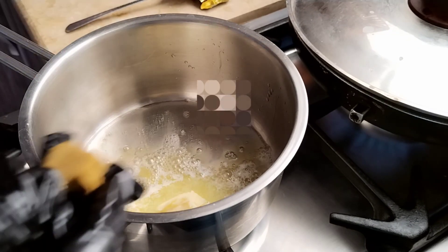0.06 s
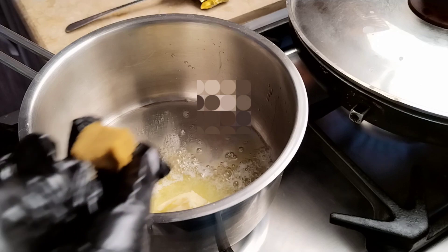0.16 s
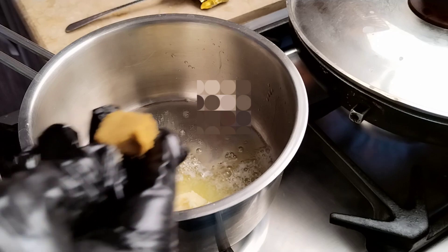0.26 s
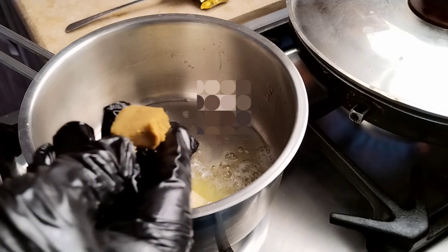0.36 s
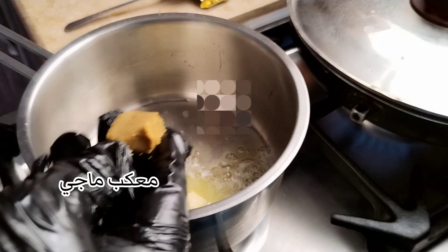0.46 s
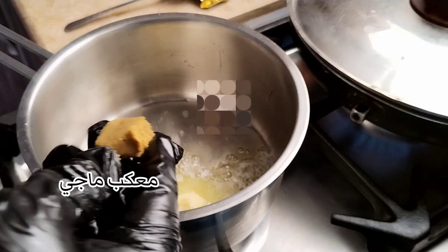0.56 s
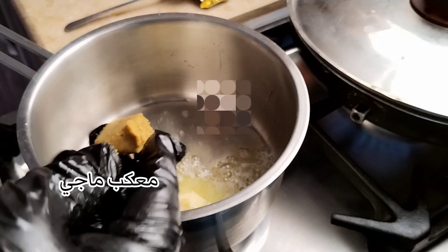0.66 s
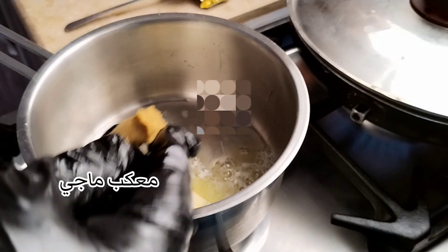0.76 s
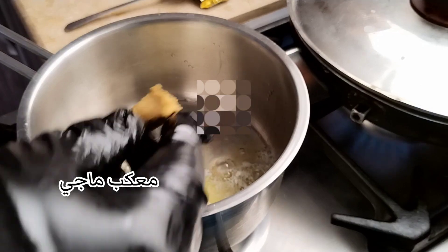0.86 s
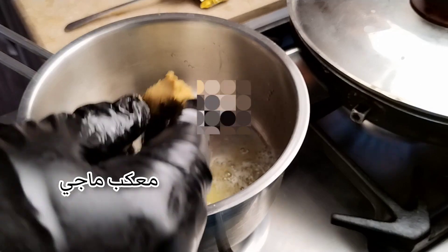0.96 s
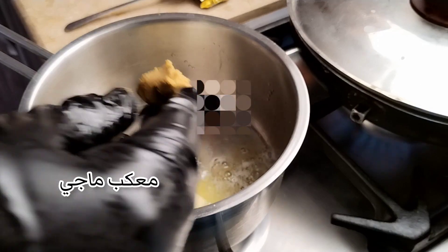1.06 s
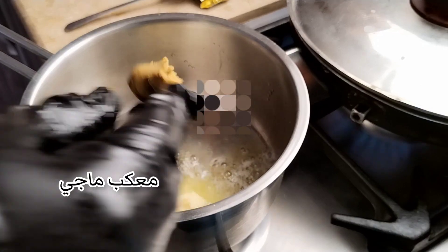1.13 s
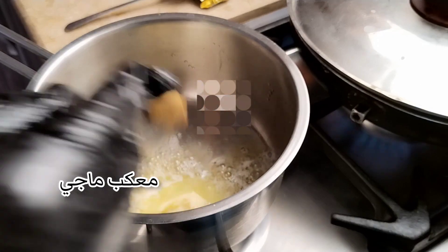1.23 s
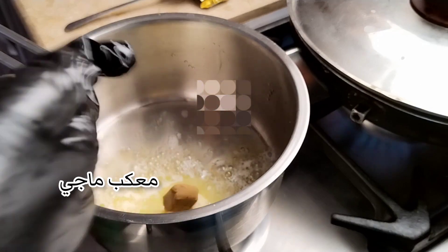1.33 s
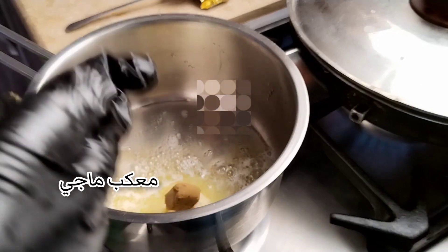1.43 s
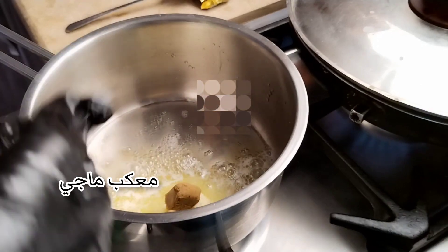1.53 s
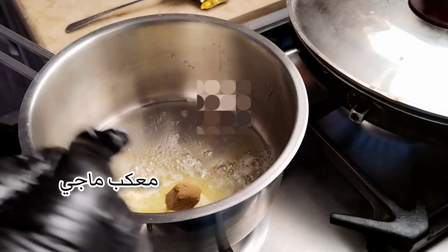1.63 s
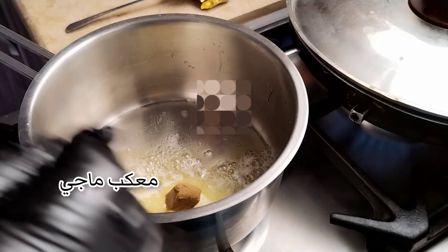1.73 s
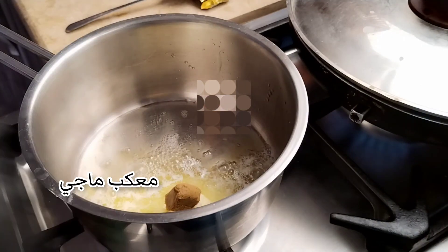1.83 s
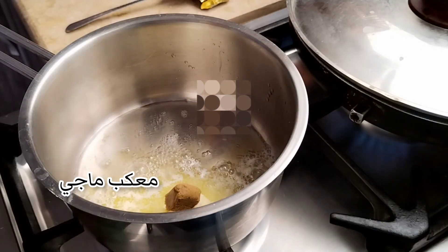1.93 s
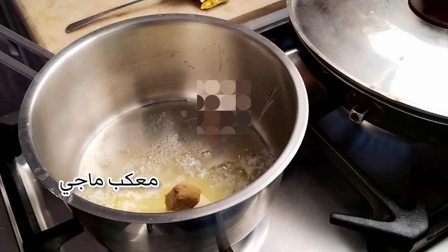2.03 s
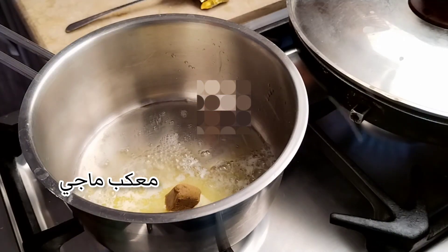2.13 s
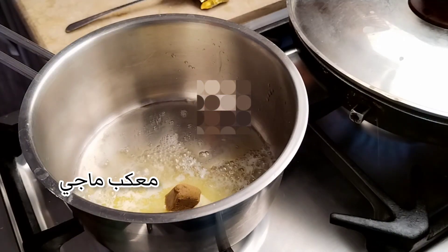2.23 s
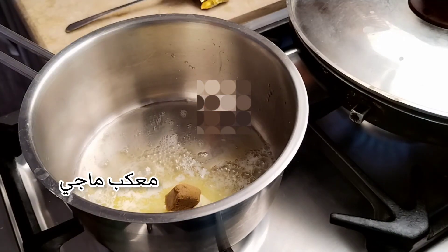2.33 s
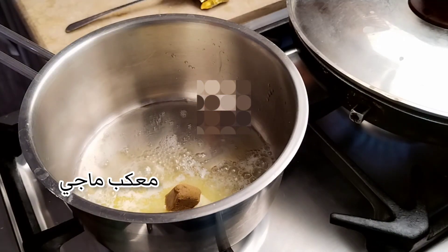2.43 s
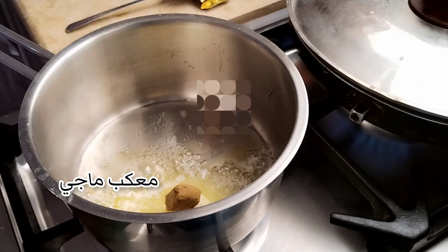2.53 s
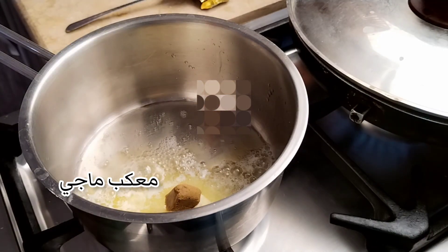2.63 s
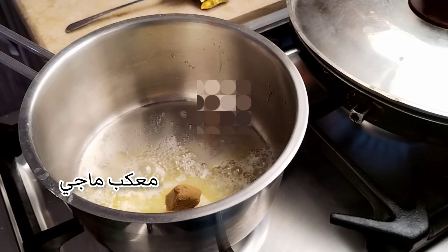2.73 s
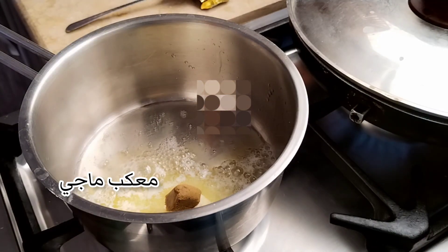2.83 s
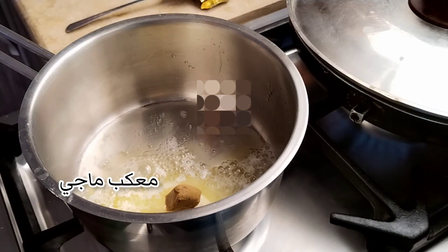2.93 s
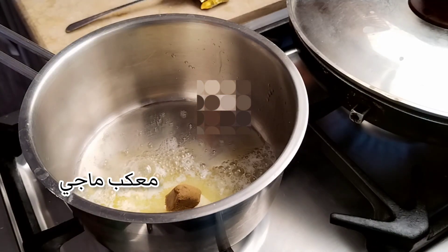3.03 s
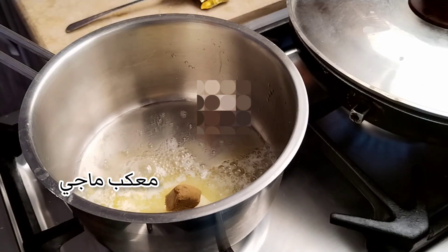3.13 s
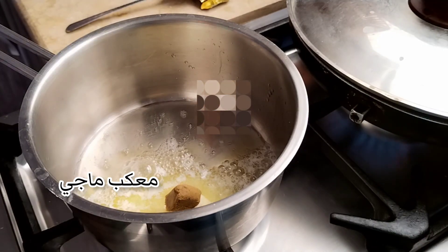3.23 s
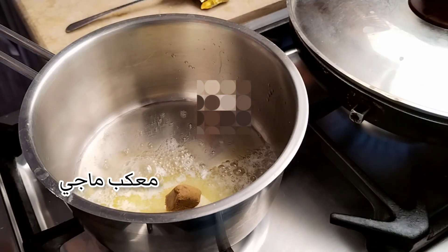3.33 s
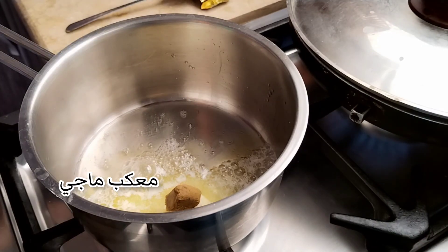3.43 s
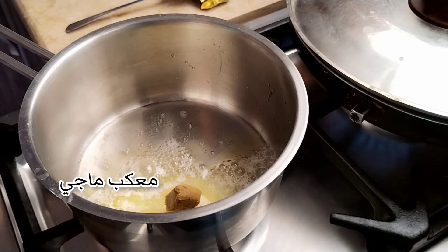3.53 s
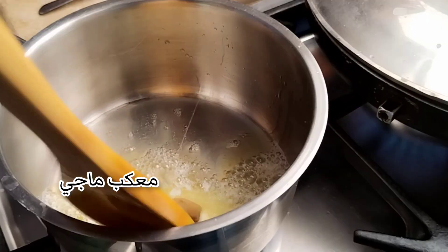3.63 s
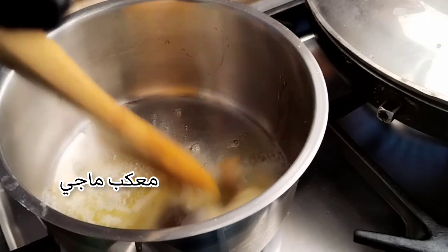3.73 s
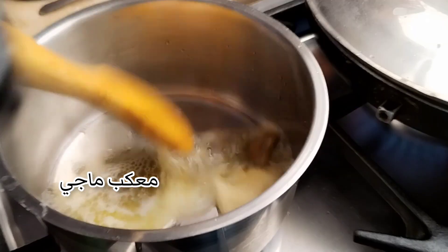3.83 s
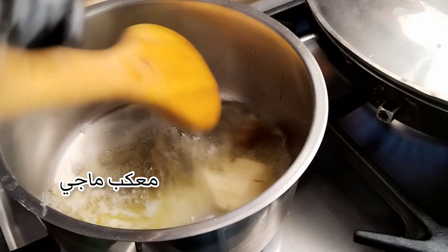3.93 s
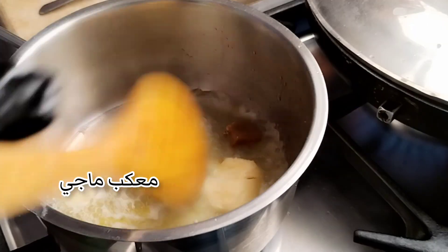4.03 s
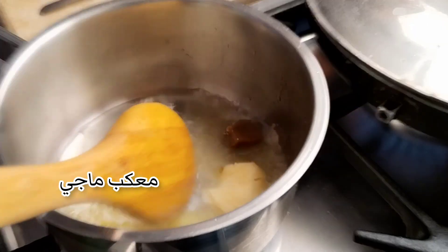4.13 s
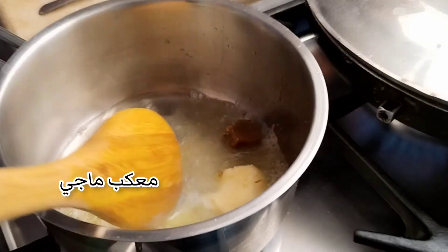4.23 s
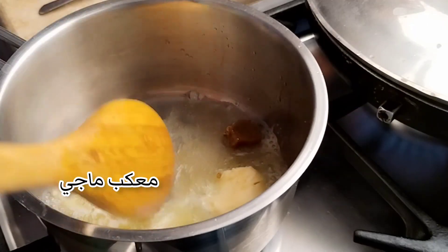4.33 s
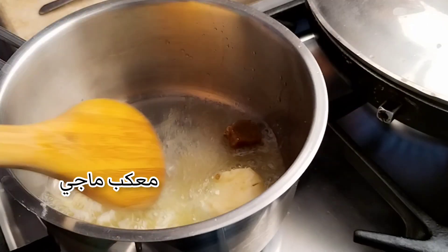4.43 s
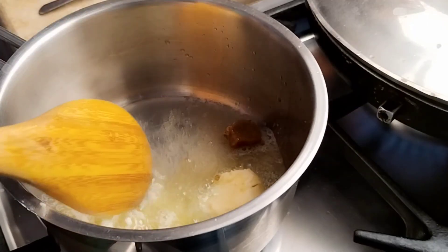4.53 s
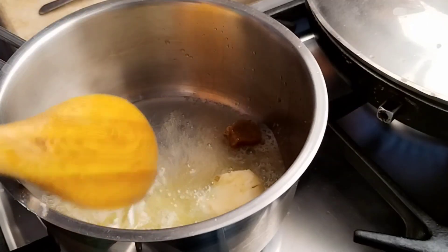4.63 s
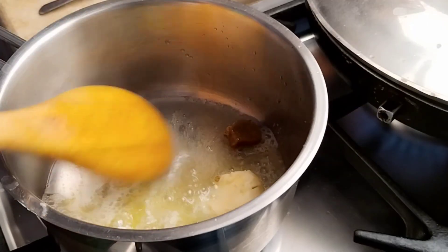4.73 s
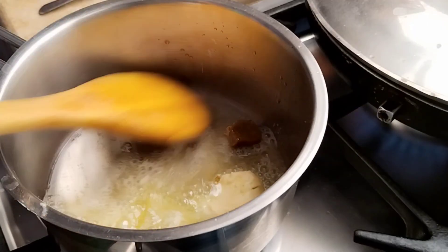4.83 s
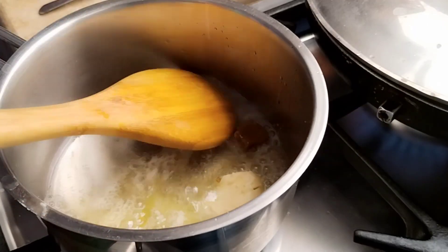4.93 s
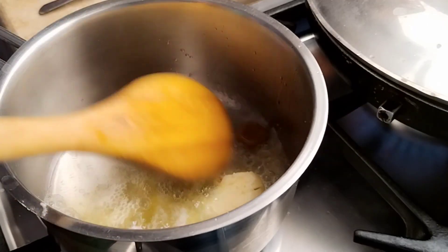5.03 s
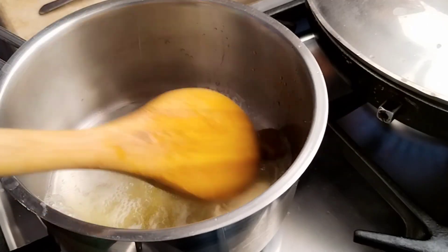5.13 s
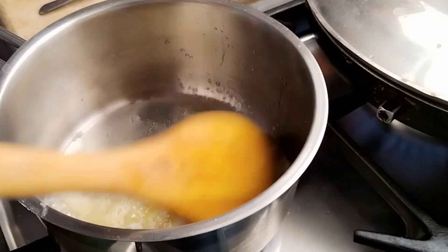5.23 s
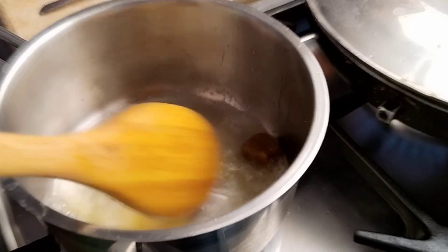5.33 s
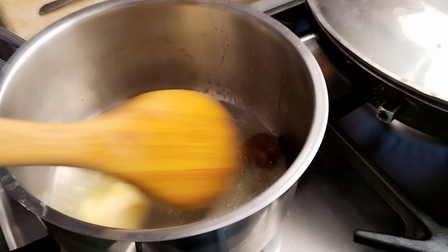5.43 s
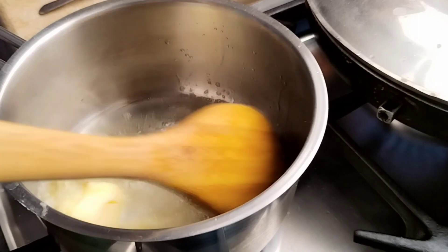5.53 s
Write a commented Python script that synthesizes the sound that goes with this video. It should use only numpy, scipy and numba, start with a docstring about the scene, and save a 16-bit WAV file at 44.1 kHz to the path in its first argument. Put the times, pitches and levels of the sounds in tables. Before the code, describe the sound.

Butter fries quietly in a steel pot on a gas ring, heard close in a small kitchen. Thin uneven sizzle and dry spits run from the start over faint low flame rumble. A bird buzzes faintly at the opening, and another whistles upward at about 0.9 s. At 1.4 s a soft cube lands with a dull thud and brief tumble; the sizzle rises a little, a bird buzzes at 1.6 s, and a cluster of hollow bubbles blurts around 2.0-2.2 s. Sizzling swells, then thins after 2.9 s amid faint chirps. At 3.57 s the sound cuts abruptly to hotter fat: a wooden spoon knocks the pot, hardest near 3.7 s, with short metallic ringing. More blows and scrapes follow around 4.1, 4.5, 4.75, 4.9 and 5.3 s over fuller hissing and bubbling. Spits get sharper and denser, with strong pops near 5.3 and 5.5 s. Birds whistle at 4.5 s and buzz at 5.1 s.

```python
"""Butter frying on a gas ring.

Butter sizzles and spits in a steel pot: shaped noise, crowds of short bubbles, bursts of damped sines.
A stock cube drops in; at 3.57 s the scene cuts to hotter fat, where a wooden spoon knocks the pot.
Blows are damped sines on wood and pot modes. Bass noise is the flame.
Small birds outside whistle and buzz: gliding and warbled near-sines with echoes.
"""
import sys
import numpy as np
from scipy import signal
from scipy.fft import rfft, irfft, next_fast_len
from scipy.io import wavfile
from scipy.ndimage import uniform_filter1d
from numba import njit

SR = 44100
rng = np.random.default_rng(int(sys.argv[2]) if len(sys.argv) > 2 else 0)


def pcm_store(signal):
    """Save signal as 16-bit PCM."""
    levels = np.round(np.clip(np.atleast_2d(signal), -1, 1) * 32767)
    wavfile.write(sys.argv[1], SR, levels.astype(np.int16).T)


N = 245179


def undb(db):
    """dB to gain."""
    return 10 ** (np.asarray(db, float) / 20)


def unit(x):
    """Scale to rms 1."""
    return x / np.sqrt(np.mean(x ** 2))


def split_off(x, order, hz, side):
    """Zero-phase low-pass or high-pass."""
    return signal.sosfiltfilt(signal.butter(order, hz, side, fs=SR, output="sos"), x)


def at_pitch(hz, table):
    """Read a (Hz, value) table on a log pitch axis."""
    at_hz, value = np.transpose(table)
    return np.interp(np.log(hz), np.log(at_hz), value)


def colour(x, points):
    """Shape a spectrum by (Hz, dB) points."""
    n = next_fast_len(x.shape[-1])
    f = np.maximum(np.fft.rfftfreq(n, 1 / SR), 1)
    return irfft(rfft(x, n) * undb(at_pitch(f, points)), n)[..., :x.shape[-1]]


def curves(table):
    """Columns of a table, one value per sample."""
    s, *columns = np.transpose(table)
    return [np.interp(np.arange(N) / SR, s, c) for c in columns]


def walk(rate):
    """Random levels held 1 / rate s and slewed; rms 1."""
    k = int(SR / rate)
    held = np.repeat(rng.standard_normal(N // k + 1), k)
    return unit(uniform_filter1d(held, k)[:N])


def pair(like):
    """Two noises that share the part `like` of their power."""
    mid, side = rng.standard_normal((2, N))
    like = np.clip(like, 0, 1)
    opposed = side * np.array([[1], [-1]])
    return (np.sqrt(1 + like) * mid + np.sqrt(1 - like) * opposed) / np.sqrt(2)


def pan(db):
    """Left and right gains for a left-minus-right level."""
    return undb(np.array([db, -db]) / 2)


@njit
def rings(n, sr, at, hz, t60, rise, glide, left, right, turn):
    """Damped sines that start at given samples; the right port hears each at another phase."""
    out = np.zeros((2, n))
    for e in range(len(at)):
        step = np.exp(2j * np.pi * hz[e] / sr - np.log(1000.) / (t60[e] * sr))
        bend = np.exp(2j * np.pi * hz[e] * glide[e] / sr ** 2)
        lead, z = np.exp(1j * turn[e]), 1 + 0j
        shut, opening = 1., np.exp(-1 / (rise[e] * sr))
        for i in range(at[e], min(n, at[e] + int(t60[e] * sr))):
            out[0, i] += (1 - shut) * left[e] * z.imag
            out[1, i] += (1 - shut) * right[e] * (z * lead).imag
            z, step, shut = z * step, step * bend, shut * opening
    return out


def ring(s, hz, t60, rise, glide, db, pan_db, turn):
    """Damped sines from columns; rise = attack in s, glide = share of pitch gained per second."""
    columns = np.broadcast_arrays(s, hz, t60, rise, glide, db, pan_db, turn)
    s, hz, t60, rise, glide, db, pan_db, turn = (np.ravel(c) * 1. for c in columns)
    left, right = undb(db) * pan(pan_db)
    hz, t60, rise = np.minimum(hz, .4 * SR), np.maximum(t60, 1e-4), np.maximum(rise, 1e-5)
    return rings(N, 1. * SR, (s * SR).astype(np.int64), hz, t60, rise, glide, left, right, turn)


def echo(x, t60, wet_db):
    """Diffuse decaying-noise tail, nearly alike left and right."""
    t = np.arange(int(t60 * SR)) / SR
    envelope = undb(-60 * t / t60) * np.minimum(t / 0.0011, 1)
    mid, side = rng.standard_normal((2, SR))[:, :len(t)] * envelope
    tail = mid + colour(side, [(250, -27.0), (700, -27.5)]) * np.array([[1], [-1]])
    tail = tail / np.sqrt(np.sum(tail[0] ** 2))
    return undb(wet_db) * signal.fftconvolve(x, tail, axes=1)[:, :N]


def bubbles(count, lo_hz, hi_hz, cycles, glide, scatter_db):
    """Bubbles at random moments, pitches and places, a few louder than the rest."""
    u = rng.random((count, 4)).T
    hz = lo_hz * (hi_hz / lo_hz) ** u[1]
    db = np.minimum(-scatter_db * np.log(1 - u[2]), 4 * scatter_db)
    pan_db, turn = 12 * (u[3] - .5), 6 * u[3] - 3
    return unit(ring(u[0] * N / SR, hz, cycles / hz, cycles / hz / 8, glide, db, pan_db, turn))


def chirp(hz):
    """A near-sine voice with faint second harmonic, and third below 5 kHz."""
    phase = 2 * np.pi * np.cumsum(hz) / SR
    third = (hz < 5000) * np.sin(3 * phase)
    return np.sin(phase) + undb(-40) * np.sin(2 * phase) + undb(-42) * third


# Rising whistles. Each row: start in s, length in s, start pitch in Hz, level in dB.
RISES = [(0.901, 0.12, 3020, -53), (2.379, 0.1, 3026, -54.5), (3.083, .124, 3030, -51.5),
         (4.483, 0.097, 3094, -49.5)]
# Notes that fall fast and level off. Each row: start in s, length in s, start pitch in Hz, level in dB.
SLIDES = [(3.632, 0.0122, 4880, -50.5), (3.666, 0.013, 4960, -48), (3.692, 0.038, 4860, -51),
          (3.9, 0.04, 3970, -53), (4.07, 0.0425, 3820, -54), (4.3, 0.016, 4674, -53)]
# Faint high notes, drooping. Each row: start in s, length in s, start pitch in Hz, level in dB.
DROOPS = [(2.874, 0.084, 8570, -77.5), (3.047, 0.073, 6100, -67.5), (3.176, 0.06, 6050, -68),
          (3.299, 0.033, 5820, -68), (3.396, 0.04, 5970, -68), (3.498, 0.047, 5970, -74)]
# Run of hooked chips. Each row: start in s, level in dB.
CHIPS = [(2.963, -65), (3.081, -62.5), (3.181, -61.5), (3.262, -57.5), (3.349, -57.5), (3.444, -57.5),
         (3.516, -55.5)]
# Glides. Each: pitch half way, at 85 % and at the end, as multiples of the start pitch.
RISE_SHAPE = (1.095, 1.245, 1.36)
SLIDE_SHAPE = (.89, .85, .84)
DROOP_SHAPE = (.965, .915, .885)
CHIP_SHAPE = (1.1, .8, .66)
TYPICAL_CHIP_S, TYPICAL_CHIP_HZ = .018, 2250
# rising notes: power of growth, share of length to stop over, extra share of pitch at the very end
RISE_SWELL, RISE_STOP, RISE_FLICK = .95, .05, .13


def whistles():
    """Pure notes gliding on a cubic of log pitch."""
    x, t = np.zeros(N), np.arange(N) / SR
    notes = [(*row, RISE_SHAPE) for row in RISES]
    notes += [(*row, SLIDE_SHAPE) for row in SLIDES]
    notes += [(*row, DROOP_SHAPE) for row in DROOPS]
    for (s, db), (a, b) in zip(CHIPS, rng.standard_normal((len(CHIPS), 2))):
        notes.append((s, TYPICAL_CHIP_S * 1.2 ** a, TYPICAL_CHIP_HZ * 1.04 ** b, db, CHIP_SHAPE))
    for s, length, start_hz, db, shape in notes:
        pitch = start_hz * np.array([1, *shape])
        i = slice(int(s * SR), int((s + length) * SR))
        u = np.clip((t[i] - s) / length, 0, 1)
        hz = np.exp(np.polyval(np.polyfit([0, .5, .85, 1], np.log(pitch), 3), u))
        gain = abs(np.sin(np.pi * u)) ** .6
        if pitch[-1] > pitch[0]:
            hz = hz * (1 + RISE_FLICK * u ** 20)
            gain = u ** RISE_SWELL * np.minimum((1 - u) / RISE_STOP, 1)
        x[i] += undb(db) * gain * chirp(hz)
    return x


# Buzzes. Each row: start in s, length in s, mean pitch in Hz, level in dB.
BUZZES = [(-.1, 0.25, 4364, -52.5), (1.624, 0.2, 4452, -54), (3.78, 0.11, 4320, -52.5),
          (5.07, 0.22, 4390, -54)]
MEAN_WARBLE_HZ, WARBLE_DEPTH_HZ = 180.7, 397


def buzzes():
    """Notes with a fast, unsteady warble of pitch, slightly louder at the top of each warble."""
    x, t = np.zeros(N), np.arange(N) / SR
    waver, drift = walk(60), walk(90)
    beat = np.sin(2 * np.pi * np.cumsum(MEAN_WARBLE_HZ * (1 + 0.16 * waver)) / SR)
    for s, length, hz, db in BUZZES:
        u = np.clip((t - s) / length, 0, 1)
        gain = abs(np.sin(np.pi * u)) ** 0.71 * (1 + 0.017 * beat)
        x += undb(db) * gain * chirp(hz + WARBLE_DEPTH_HZ * beat + 45 * drift)
    return x


DIRECT_DB, NEAR_T60_S, NEAR_DB, YARD_T60_S, YARD_DB = -2, .07, -1.5, 0.78, -3


def birds():
    """Whistles and buzzes of unsteady level, smeared by the yard and the kitchen."""
    x = (whistles() + buzzes()) * undb(2.3 * walk(70)) * pan(0.33)[:, None]
    return undb(DIRECT_DB) * x + echo(x, NEAR_T60_S, NEAR_DB) + echo(x, YARD_T60_S, YARD_DB)


# Under the hiss. Each row: time in s, low simmer in dB, high simmer in dB, flame in dB.
STOVE = [(0, -76.5, -91, -70), (.35, -83, -86, -73.5), (.9, -79.5, -84, -73), (1.3, -81, -85.5, -80.5),
         (1.5, -83.5, -91, -65), (1.94, -78, -85.5, -73.5), (2.16, -78, -80, -71.5),
         (2.44, -83, -77, -68.5), (2.7, -73.5, -79, -70.5), (2.95, -86.5, -82, -79),
         (3.3, -80.5, -81, -64.5), (3.57, -82, -84, -73.5), (3.574, -57, -56.5, -61.5),
         (3.7, -69, -63.5, -74), (4.05, -72, -59, -66.5), (4.3, -55, -55, -63.5), (4.5, -72, -64, -72),
         (4.85, -73.5, -58, -67), (5.05, -75, -54, -62.5), (5.15, -112, -62.5, -67.5),
         (5.28, -60, -66, -63.5), (5.56, -73, -54, -60)]
# Flame spectrum. Each row: pitch in Hz, relative level in dB.
FLAME = [(12, -18), (20, -72), (38, -6), (81, -9), (97, -0.5), (118, 6), (149, -6.5), (163, -3),
         (236, -14.5), (300, -52), (390, -20.5), (660, -120)]
FLAME_LIKE, FLAME_LEFT_DB = .94, -4.5  # shared part of power, left minus right


def flame():
    """Gas flame: bass noise of wandering level, nearly alike left and right."""
    _, _, flame_db = curves(STOVE)
    rumble = unit(colour(pair(FLAME_LIKE), FLAME))
    return undb(flame_db + 2.2 * walk(9.6)) * rumble * pan(FLAME_LEFT_DB)[:, None]


# Cube lands and tumbles, then from 3.573 s the spoon strikes. Each row: start in s, thud in dB, clack in dB,
# tilt above the clack in dB per octave, scrape in dB, metal ring re the blow in dB, extra on the ping in dB.
KNOCKS = [(1.4, -42, -76, 11, -64, -27, -2), (1.407, -47.5, -103, 17, -55, -12.5, -5),
          (1.427, -47.5, -101, -6, -87, -20, -2), (1.448, -53, -94, 9, -74, -26, -4),
          (1.466, -52.5, -92, -2, -80, -24, 0), (1.501, -50.5, -88, -3, -83, -29, 0),
          (1.532, -57, -75, 5, -77, -35, -7), (3.573, -42, -37.5, -15.5, -60, -9, -10),
          (3.59, -39, -38, -21, -67, -22, -3), (3.605, -45, -55, -17, -60, -20, 2),
          (3.668, -53, -35, -19, -50.5, -28, -4), (3.722, -28.5, -22.5, -12.5, -55, -14, -2),
          (3.76, -29, -37.5, -7, -32.5, -18, -14), (3.778, -35, -38, -0.5, -49, -12, -3.5),
          (4.095, -47.5, -23, -10.5, -48, -13, -2), (4.102, -35, -32.5, -10.5, -35, -10, 6),
          (4.498, -109, -40, -6.5, -53, -22, 2), (4.749, -110, -35.5, -13.5, -47, -16, 9),
          (4.888, -39, -28, -11.5, -38, -16, -6), (4.899, -31.5, -29.5, -23, -44.5, -18, 3),
          (5.203, -67, -56, 5, -67, -22, 1), (5.321, -30, -28, -2.5, -85, -13.5, -12),
          (5.471, -75, -33, -8, -40, -22.5, 3)]
# Pot modes. Each row: pitch in Hz, relative level in dB, t60 in s before RING_SHARE and scatter.
POT = [(205.2, 10, 1.09), (266.4, -1.5, 0.75), (287.8, -3, 1.2), (315, -12.5, 0.75), (410, -4, 0.55),
       (557.6, -2.5, 0.51), (752, -13, 0.75), (820, -11, 0.79), (860, -7, 1.7), (1095, 2, 0.78),
       (1286, -14.5, 1.6), (1527, -4, 1.3), (2290, -12, 0.14), (2810, 8, 0.27), (3320, -1.5, 0.39),
       (5540, 8, 0.09), (6530, 10.5, 0.057), (6740, 2.5, 0.12)]
# Colour of a blow by pot and spoon. Each row: pitch in Hz, gain in dB.
BODY = [(175, -14), (240, -7), (330, -12.5), (420, -1.5), (500, -14), (600, -0.5), (700, 0), (810, -1.5),
        (1050, -16), (1300, 3), (1520, 11.5), (1900, 2), (2300, 9.5), (2900, 1), (4500, 9)]
# Balance of a blow. Each row: pitch in Hz, left minus right in dB.
BLOW_PAN = [(60, -1.5), (110, -3), (200, -7), (380, 1.5), (700, -3), (1290, -3), (2380, -8.5), (4400, -1),
            (8120, -12), (15000, 3.5)]
# Phase of a blow before scatter. Each row: pitch in Hz, lead of the left port in radians.
BLOW_PHASE = [(250, 0.03), (500, 0.95), (780, 1.5), (1500, -2.5), (2240, -6), (4480, -4)]
# Kitchen's answer to a blow. Each row: pitch in Hz, gain in dB.
TAIL_COLOUR = [(300, 7), (1000, -1.5), (2200, -4), (5000, -4)]
THUD_HZ, CLACK_HZ, TILT_TO_HZ, SCRAPE_HZ = 300, 800, 2450, 5800
WOOD_DB, RING_SHARE, CONTACT_S = -6.5, 0.36, .0028
DRAG_S = 0.015  # the top of a blow is a short chatter of the spoon dragging
PING_HZ = 1527  # the mode that depends most on where the blow lands
PAIR_SPLIT = .006  # each mode is a close pair that beats


def knocks():
    """Each blow is a dense wooden thud; the pot's modes ring on, weighted by where and how hard it lands."""
    s, thud_db, clack_db, tilt_db, scrape_db, metal_db, ping_db = np.transpose(KNOCKS)
    s = s[:, None]
    tilted_db = clack_db + tilt_db * np.log2(TILT_TO_HZ / CLACK_HZ)
    bands_hz = [THUD_HZ, CLACK_HZ, TILT_TO_HZ, SCRAPE_HZ]
    bands_db = np.transpose([thud_db, clack_db, tilted_db, scrape_db])

    def blow_db(hz):
        push_db = [at_pitch(f, list(zip(bands_hz, b))) for f, b in zip(hz, bands_db)]
        return np.array(push_db) + at_pitch(hz, BODY)

    def turn(hz):
        scatter = np.clip(hz / 1500 - .1, .1, 2.) * rng.standard_normal(hz.shape)
        return scatter - at_pitch(hz, BLOW_PHASE)

    hz, mode_db, t60 = np.repeat(np.transpose(POT), 2, axis=1)
    u = rng.standard_normal((3, len(s), len(hz)))
    hz = hz * (1 + PAIR_SPLIT / 2 * (-1) ** np.arange(len(hz)) + .002 * u[0])
    t60 = RING_SHARE * t60 * 1.2 ** u[2]
    # low modes take longer to swing up under a soft wooden push
    rise = 1.2 / hz + DRAG_S / 4 * (hz > 4000)
    scatter_db = np.where(abs(hz - PING_HZ) < 40, ping_db[:, None], 4 * u[1] - 3)
    db = blow_db(hz) + mode_db + metal_db[:, None] + scatter_db
    metal = ring(s, hz, t60, rise, 0, db, at_pitch(hz[0], BLOW_PAN), turn(hz))

    u = rng.random((2, len(s), 40))
    hz = 185 * 40 ** ((np.arange(40) + u[0]) / 40)
    when = s + (CONTACT_S + DRAG_S * (hz > 4000)) * u[1]
    t60, rise = 9 / hz + .012, .12 / hz
    wood = ring(when, hz, t60, rise, 0, blow_db(hz) + WOOD_DB, at_pitch(hz, BLOW_PAN), turn(hz))

    blows = metal + wood + echo(colour(wood, TAIL_COLOUR), 0.54, -5) + echo(metal, .3, -8)
    return signal.sosfilt(signal.butter(4, 170, "high", fs=SR, output="sos"), blows)


TAIL_RE_CLACK_DB, TAIL_RISE_S, TAIL_T60_S = -23.5, 0.096, 0.5


def blow_tails():
    """Gain of the noise tail after each blow: a slow rise, then a long fall."""
    s, _, clack_db, *_ = (c[:, None] for c in np.transpose(KNOCKS))
    late = np.maximum(np.arange(N) / SR - s, 0)
    fall = undb(clack_db + TAIL_RE_CLACK_DB - 60 * late / TAIL_T60_S)
    return np.sum(fall * (1 - np.exp(-late / TAIL_RISE_S)), axis=0)


STEADIER_FROM_DB, STEADIER_TO_DB, STEADIER_SHARE = -85.5, -28.5, 0.65


def unevenness(hiss_db):
    """Between these hiss levels, random level changes shrink to STEADIER_SHARE as the hiss grows."""
    return np.interp(hiss_db, [STEADIER_FROM_DB, STEADIER_TO_DB], [1, STEADIER_SHARE])


# Simmer colour. Each row: pitch in Hz, gain in dB.
SIMMER = [(150, -13.5), (250, 1.5), (295, -2.5), (425, -9.5), (512, -15.5), (557, -5), (685, -5), (801, -7),
          (1180, -6), (1570, -3), (2130, -4.5), (2360, -2), (3000, -6), (3900, -56), (6600, -120)]
SIMMER_SPLIT_HZ = 1350


def simmer():
    """Noise plus the echo of small bubbles, in two bands of uneven level, swelling after each blow."""
    low_db, high_db, _ = curves(STOVE)
    hiss_db, _ = curves(FRY)
    small = bubbles(count=1200, lo_hz=450, hi_hz=2800, cycles=22, glide=.6, scatter_db=2.2)
    burble = colour(undb(2) * pair(.25) + echo(small, .12, 0), SIMMER)
    low = split_off(burble, 4, SIMMER_SPLIT_HZ, "low")
    tails = blow_tails()
    bands = (undb(low_db) + tails) * unit(low) + (undb(high_db) + tails) * unit(burble - low)
    return undb(3.65 * unevenness(hiss_db) * walk(17)) * bands


# Low bubbles. Each row: start in s, level in dB, pitch in Hz, left minus right in dB.
BLOOPS = [(.391, -58, 1588, 1), (.688, -61, 600, -17), (.753, -54, 850, 7), (1.237, -65, 419, 7),
          (1.364, -64.5, 645, 14), (1.37, -59, 776, 7), (1.52, -69, 774, 13), (1.613, -68, 411, 21),
          (1.661, -59, 616, 1), (1.83, -54, 740, 4), (1.942, -56, 580, -11), (1.998, -54, 710, -6),
          (2.027, -36, 770, 1), (2.094, -36, 1330, 0), (2.103, -34, 747, 1), (2.11, -58, 392, 14),
          (2.129, -51, 612, -11), (2.169, -62, 590, 1), (2.189, -47, 1380, 2), (2.23, -49, 1600, 3),
          (2.326, -54, 1650, 0), (2.228, -51, 717, 1), (2.38, -76, 293, 9), (2.385, -69.5, 572, -42.5),
          (2.505, -53.5, 722, 4), (2.563, -55, 783, 8), (2.685, -70, 790, 40), (2.919, -74.5, 589, -40.5),
          (3.003, -53.5, 585, -8), (3.081, -65.5, 407, 13), (3.347, -71, 410, 16), (3.399, -65, 415, 4)]
# cycles of ring at a given level; halved for so many dB louder
BLOOP_CYCLES, BLOOP_AT_DB, BLOOP_HALVES_DB = 40.3, -60.5, 22


def bloops():
    """Large bubbles: low notes that glide up with a small click, caught by the pot's air."""
    s, db, hz, pan_db = np.transpose(BLOOPS)
    t60 = BLOOP_CYCLES / hz * 2 ** ((BLOOP_AT_DB - db) / BLOOP_HALVES_DB)
    click = ring(s, 2.2 * hz, .008, .0002, 0, db - 9.5, pan_db, 2.1)
    x = ring(s, hz, t60, 0.0014, 0.93, db, pan_db, 1.28) + click
    return x + echo(x, 0.4, -4.0)


# Water droplets bursting in the fat. Each row: start in s, snap in dB, pitch in Hz,
# then re the snap in dB: hollow part, sharp part, splash.
SPITS = [(0.18, -40, 5700, -9, -5, -11), (0.246, -42.5, 5870, -37, -41, -3),
         (0.4705, -35.5, 5700, -15, -17, -1.5), (0.657, -49.5, 5800, -32, -33, 0),
         (0.7102, -51, 5750, -21, -24, -2), (0.7536, -48.5, 2850, 8, -10, -7),
         (0.829, -43, 5450, -10, -32, -3), (0.848, -46, 5630, -15, -30, -5),
         (0.871, -45.5, 3840, -28, -24, -3), (0.904, -41.5, 5800, -40, -29, -1),
         (1.07, -32.5, 5820, -10.5, -18, -7.5), (1.106, -39.5, 3150, -17, -43, 1),
         (1.1224, -35, 5590, -35, -11, 5), (1.1451, -31, 5800, -15, -41, -25),
         (1.2794, -33.5, 4080, -18.5, -5.5, -13.5), (1.406, -40, 5400, -9.5, -33, -35),
         (1.449, -36, 4900, -16.5, -7, 0), (1.515, -29.5, 7870, -14, -24, -13),
         (1.665, -29, 3300, -30, -21, -6), (1.8329, -48, 2820, -3, -31, -14),
         (1.846, -37.5, 5900, -20, -10, -6), (2.0282, -34.5, 5300, -14, -5.5, 1.5),
         (2.182, -48, 6700, -34, 10, -21), (2.243, -42, 5400, -27, -19, -8),
         (2.2802, -31.5, 5800, -11, -3, -1.5), (2.2897, -28.5, 6860, -8, -21, -27),
         (2.34, -48.5, 6460, -16, 8, 8.5), (2.5687, -33, 5900, -7.5, -6, -9),
         (2.6859, -42.5, 2470, 12, 7, -2), (2.762, -35.5, 5530, -15, 1, 0.5),
         (2.9587, -35.5, 5130, -11.5, -81, -2.5), (3.0966, -58, 5870, -28, 0.5, 25),
         (3.1088, -35.5, 4100, -27, -25, -6), (3.139, -52, 3340, -32, 19.5, -19),
         (3.415, -51, 5400, -24, -40, 4), (3.433, -46, 5840, -16, -34, -4),
         (3.466, -43.5, 5500, -25, -30, -8), (3.5493, -29.5, 6480, -42, -9, -53),
         (3.5745, -33, 5470, -12.5, -8.5, -2), (3.67, -44.5, 4900, 0, 6, -9), (4.08, -39, 6500, 3, -18, -6),
         (4.3802, -28.5, 4500, -25, -3, -8), (4.404, -32.5, 3320, -2, -9, -20),
         (4.501, -33, 5200, -7, -4, -30), (4.609, -33, 6240, -13, 8, -29),
         (4.6415, -38.5, 5150, -8.5, 12.5, 3), (4.751, -33, 2230, 12, -18, -10.5),
         (4.732, -32, 8400, -45, -9, -18), (4.777, -28, 6730, -17, 0.5, 1.5),
         (4.8492, -27, 8300, -8, -22, -6), (4.887, -29, 5600, -2.5, 5, -3),
         (4.9987, -47.5, 9000, 12, 21.5, 2.5), (5.085, -40, 8500, -34, -1, -15),
         (5.149, -37, 8200, -24, -3, -15), (5.204, -33, 2200, 1.5, -20, -7),
         (5.232, -37, 8760, -6.5, 16.5, -12), (5.255, -28, 7400, -22.5, -25, -13),
         (5.2957, -19, 6260, -8, -8.5, -6.5), (5.3655, -28.5, 8620, -21, -3, -20),
         (5.42, -26.5, 6170, -13, -13, -15), (5.462, -30, 8400, -23, 6, -23),
         (5.489, -40, 8300, -31, -6, -9), (5.5028, -20.5, 7190, -6.5, -36, -13)]
# Balance of a burst. Each row: pitch in Hz, left minus right in dB.
SPIT_PAN = [(2500, 4.5), (3500, 0), (5800, -7), (7000, -9.5), (8500, 16), (11000, 5.5)]
SNAP_T60_S, SNAP_RISE_S, POT_AIR_T60_S, ROOM_T60_S = .005, .0008, .03, 0.46
# finest ticks re the snap, stronger for high bursts
SPIT_FINEST_DB, FINEST_AT_HZ, FINEST_DB_PER_OCTAVE = -27, 6100, 37
SHARP_LEFT_DB, FINEST_LEFT_DB = 14, 1  # ticks lean to the left port


def spits():
    """Each burst: a dry snap spread round its pitch, a hollow pot note, sharp ticks above, a splash tail."""
    s, db, hz, hollow_db, sharp_db, splash_db = (c[:, None] for c in np.transpose(SPITS))
    pan_db = np.interp(hz, *np.transpose(SPIT_PAN))
    u = rng.random((len(s), 3, 6))
    when = s + 0.00073 * u[:, 0]
    pitch = (np.arange(6) + u[:, 1]) / 6  # 0 to 1 over each cluster of six
    turn = 2 * np.pi * u[:, 2]
    snap_hz, centred_db = hz * 1.6 ** (pitch - .5), 3 - 18 * abs(pitch - .5)
    snap_pan_db = np.interp(snap_hz, *np.transpose(SPIT_PAN))
    hollow_hz, hollow_t60 = np.array([1640, 1740, 2500]), np.array([.06, .05, .019])
    hollow_db = hollow_db - np.array([6, 8, 4])
    fine_db = SPIT_FINEST_DB + FINEST_DB_PER_OCTAVE * np.log2(hz / FINEST_AT_HZ)

    def burst(db):
        snap = ring(when, snap_hz, SNAP_T60_S, SNAP_RISE_S, 0, db + centred_db, snap_pan_db, turn)
        low = ring(s, hollow_hz, hollow_t60, 0.0041, 0, db + hollow_db, pan_db, [2.1, 1.7, .4])
        tick = ring(when, 7300 * 1.4 ** pitch, SNAP_T60_S, 0.0039, 0, db + sharp_db, SHARP_LEFT_DB, turn)
        fine = ring(when, 10300 * 1.45 ** pitch, SNAP_T60_S, 0.00097, 0, db + fine_db, FINEST_LEFT_DB, turn)
        return snap + low + tick + fine

    dry_burst = burst(db)
    in_pot = undb(-1) * dry_burst + echo(dry_burst, POT_AIR_T60_S, wet_db=-5)
    return in_pot + echo(burst(db + splash_db), ROOM_T60_S, wet_db=0)


# Frying fat, before and after a cut at 3.57 s. Each row: time in s, hiss in dB, treble of the hiss in dB.
FRY = [(0, -70.5, -79), (.23, -71, -90), (.33, -91, -99), (.5, -70.5, -100), (.7, -78.5, -98),
       (.93, -83, -101), (1.11, -74.5, -101), (1.41, -70, -94), (1.54, -63.5, -74), (1.75, -66.5, -84),
       (1.94, -74.5, -83), (2.1, -63.5, -70.5), (2.33, -60.5, -73.5), (2.44, -68.5, -71.5),
       (2.65, -61, -68), (2.95, -69.5, -85.5), (3.13, -80, -83), (3.28, -77, -87.5), (3.57, -73, -89),
       (3.574, -63.5, -89), (3.71, -66.5, -67), (3.77, -41.5, -70), (3.86, -59, -57), (3.98, -56, -62.5),
       (4.1, -54.5, -59.5), (4.57, -53.5, -63.5), (4.79, -50.5, -64.5), (5.13, -54.5, -61),
       (5.45, -57.5, -54), (5.56, -47, -55)]
# Level of the band above 10.2 kHz. Each row: time in s, level in dB.
AIR_BAND = [(0.0, -80), (0.22, -92), (0.59, -93), (1.38, -92), (1.53, -90), (1.67, -82), (1.86, -90),
            (2.09, -92), (2.34, -83), (2.69, -84), (2.85, -85), (3.08, -103), (3.24, -87), (3.56, -96),
            (3.7, -81), (3.93, -70), (4.09, -68.5), (5.28, -76), (5.47, -85), (5.56, -71)]
# Hiss colour. Each row: pitch in Hz, gain in dB.
HISS = [(1290, -59), (2200, -15), (2430, -7.5), (3150, -2), (3360, -1), (3650, -6.5), (6200, 1.5),
        (7010, -5.5), (8670, -4.5), (10000, -17.5), (14000, -10), (14700, -97), (15500, -61)]
# Balance of the hiss. Each row: pitch in Hz, left minus right in dB.
PORTS = [(60, 3), (110, -17), (200, -2), (380, -16), (700, -23), (1290, -8), (2380, 2.5), (4400, -5.5),
         (8120, -7), (15000, 4)]
TREBLE_LEFT_DB = 21  # the treble leans further to the left port
TREBLE_FROM_HZ, AIR_BAND_FROM_HZ = 7400, 10200


def hiss():
    """Frying hiss: noise, rising bubbles and short crackle, in three bands of uneven level."""
    hiss_db, treble_db = curves(FRY)
    air_db, = curves(AIR_BAND)
    fizz = bubbles(count=4000, lo_hz=2480, hi_hz=13200, cycles=87, glide=4.7, scatter_db=6.5)
    crackle = bubbles(count=4000, lo_hz=3000, hi_hz=13000, cycles=7, glide=0, scatter_db=3.1)
    crackle = crackle + echo(crackle, 0.071, -4.5)
    steam = colour(pair(0.31) + undb(-14.5) * fizz + undb(-3.5) * crackle, HISS)
    steam = np.array([colour(steam[k], np.array(PORTS) * [1, .5 - k]) for k in range(2)])
    top = split_off(steam, 3, TREBLE_FROM_HZ, "high")
    air = split_off(steam, 3, AIR_BAND_FROM_HZ, "high")
    body = undb(hiss_db + 4.6 * unevenness(hiss_db) * walk(24)) * unit(steam - top)
    treble = undb(treble_db + 4.3 * walk(25)) * unit(top - air) * pan(TREBLE_LEFT_DB)[:, None]
    return body + treble + undb(air_db + 0.88 * walk(39)) * unit(air)


def scene():
    """All sources at the two ports."""
    return birds() + flame() + knocks() + simmer() + bloops() + spits() + hiss()


TOP_HZ = 15350


def record(dry):
    """A steep elliptic low-pass cuts the top."""
    return signal.sosfilt(signal.ellip(8, .2, 70, TOP_HZ, fs=SR, output="sos"), dry)


dry = scene()
out = record(dry)
pcm_store(out)
```